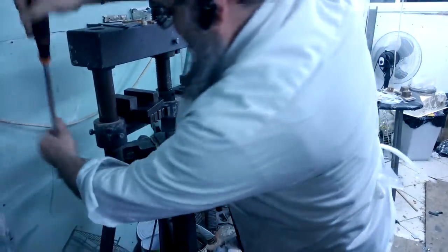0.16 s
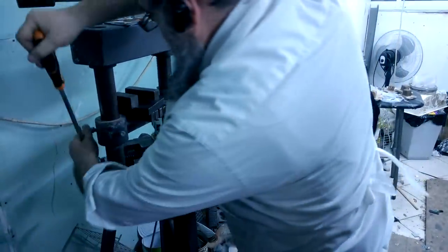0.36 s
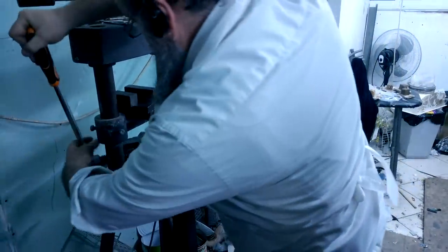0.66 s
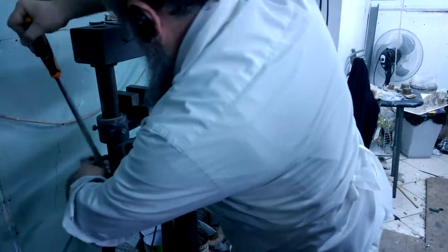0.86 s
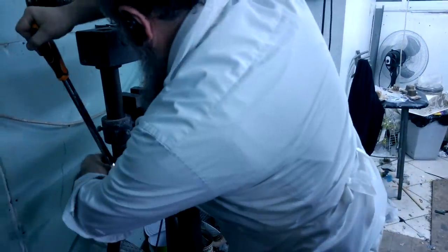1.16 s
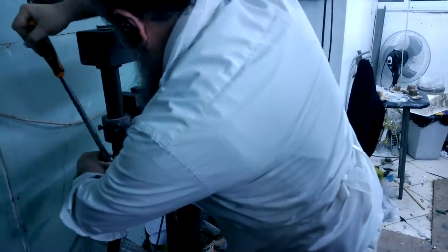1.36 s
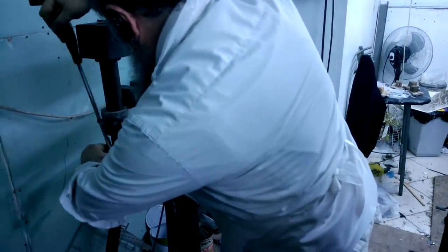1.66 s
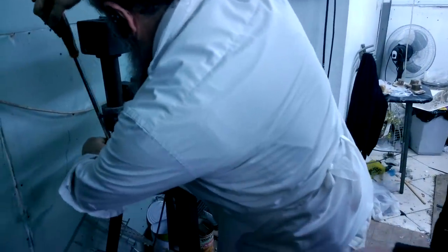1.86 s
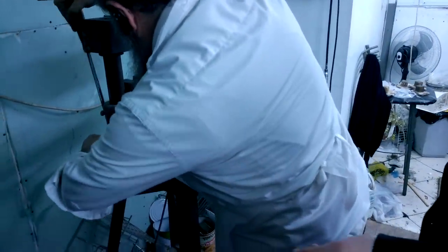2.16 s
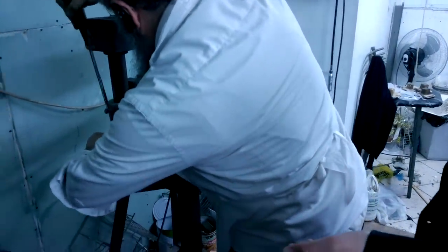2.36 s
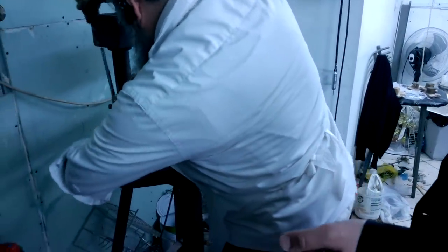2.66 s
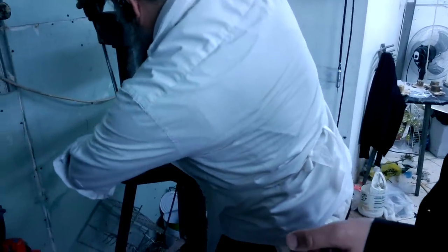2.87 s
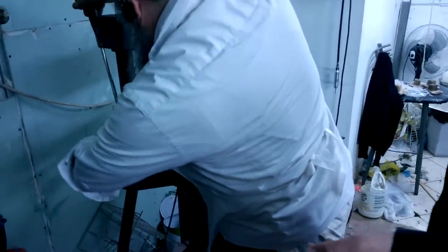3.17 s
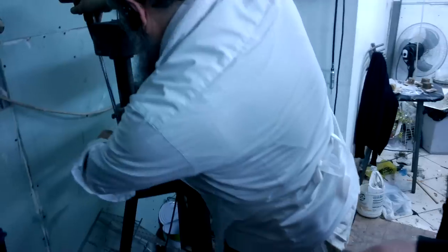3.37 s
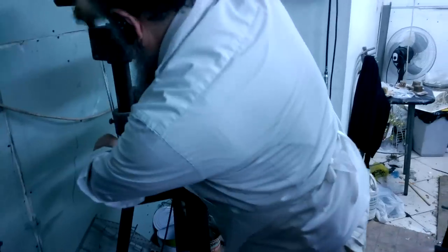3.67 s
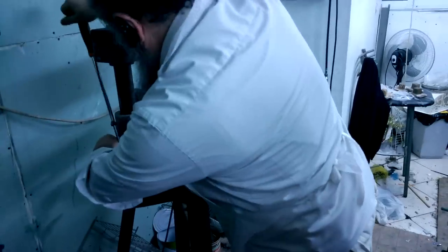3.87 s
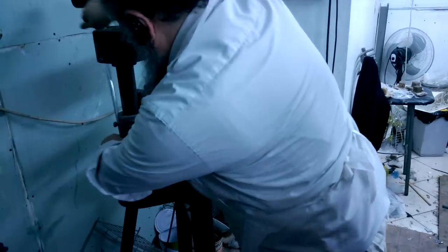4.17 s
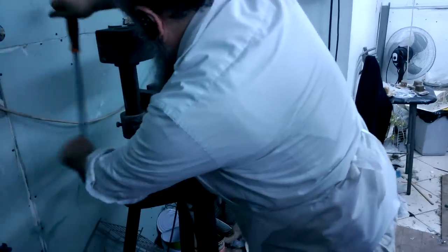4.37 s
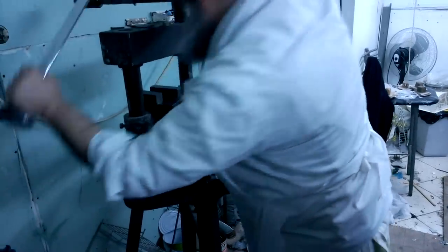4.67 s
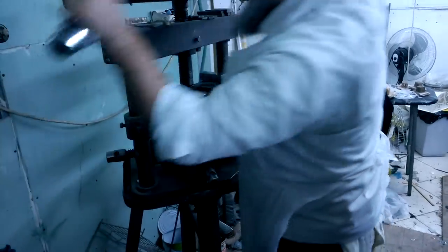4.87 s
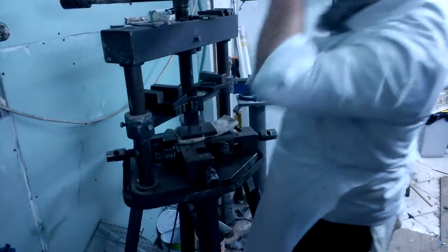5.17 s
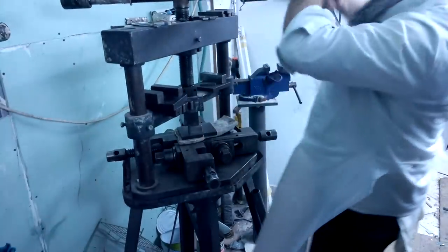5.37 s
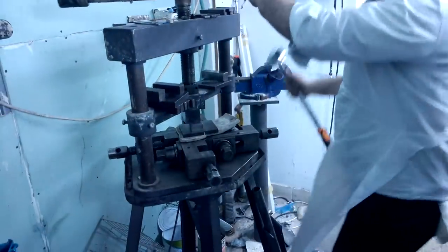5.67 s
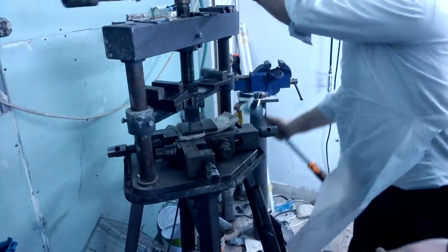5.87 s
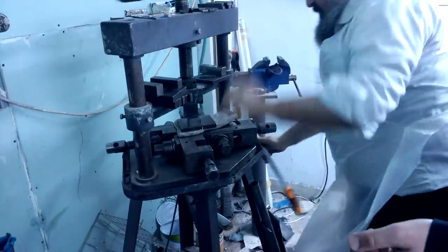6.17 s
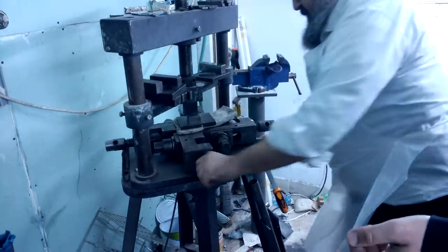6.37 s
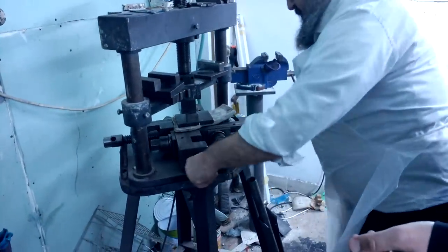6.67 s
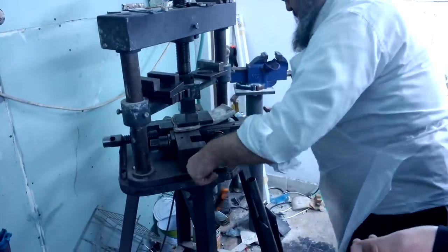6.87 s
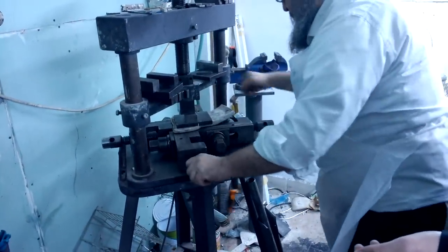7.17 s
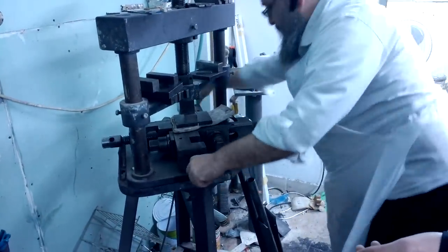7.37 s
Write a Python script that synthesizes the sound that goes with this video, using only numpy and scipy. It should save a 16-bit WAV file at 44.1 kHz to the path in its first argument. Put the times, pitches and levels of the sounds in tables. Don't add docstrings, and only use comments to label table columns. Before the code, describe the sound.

Close to a small bright microphone, steel strikes steel: a tick, two heavy ringing knocks, another shove, then blocks shifting with dull floor thuds. Crisp double ticks and a solid block clank follow. After a lull of fan hum and cloth rustle, a bar clatters down onto a metal table, its end drops, and faint taps finish. Short hard room; the background dips after loud hits.

```python
import sys
import numpy as np
from scipy import signal
from scipy.fft import rfft, irfft, next_fast_len
from scipy.io import wavfile
from scipy.ndimage import uniform_filter1d

SR = 44100
rng = np.random.default_rng(int(sys.argv[2]) if len(sys.argv) > 2 else 0)


def magnitude_from_level(level_db):
    exponent = np.asarray(level_db, float) / 20
    return 10 ** exponent


def materialize(psi):
    bounded = np.clip(np.atleast_2d(psi).T, -1, 1)
    quanta = np.round(bounded * 32767).astype(np.int16)
    wavfile.write(sys.argv[1], SR, quanta)


N = 331632


def rms_one(x):
    return x / np.sqrt(np.mean(x ** 2) + 1e-20)


def at_hz(points, hz):
    table_hz, value = np.array(points).T
    return np.interp(np.log(hz), np.log(table_hz), value)


def add(out, s, sound):
    i = round(s * SR)
    out[i:i + len(sound)] += sound[:N - i]


def drift(rate_hz):
    r = np.exp(-80 * np.pi * rate_hz / SR)
    slow = signal.lfilter([1], [1, -2 * r, r * r], rng.standard_normal(N // 40 + 2002))[2000:]
    return np.interp(np.arange(N) / 40, np.arange(len(slow)), rms_one(slow))


def coloured(spectrum, patchy_db):
    hz = np.maximum(np.fft.rfftfreq(N, 1 / SR), 1)
    noise = irfft(rfft(rng.standard_normal(N)) * magnitude_from_level(at_hz(spectrum, hz)), N)
    return rms_one(noise * magnitude_from_level(patchy_db * drift(5.7)))


def swells(rows, rest_db):
    t = np.arange(N) / SR
    return magnitude_from_level(rest_db) + sum(magnitude_from_level(db) * np.exp(-((t - s) / half) ** 2) for s, db, half in rows)


def partial(hz, t60, rise, t, spread_hz=0):
    knots = rng.standard_normal((2, 600))
    knots[:, 0] = 0
    in_phase, in_quadrature = [np.interp(t * max(spread_hz, 0) * 2.5, np.arange(600), k) for k in knots]
    rough = np.clip(spread_hz / 50, 0, .93)
    turn = 2 * np.pi * hz * t
    wave = (np.sqrt(1 - rough ** 2) + rough * in_phase) * np.sin(turn) + rough * in_quadrature * np.cos(turn)
    build_up = 1 - np.exp(-t / max(rise, 1e-4))
    return wave * build_up * np.exp(-np.log(1000) * t / t60)


# f/Hz, density/dB
HISS_COLOUR = [(410, -15), (700, 3.5), (1210, -4), (2120, 4.5), (3520, -5.5), (5130, -0.5), (7290, -2),
               (9330, -28), (12300, -5), (15100, -4), (15700, -4)]


def hiss():
    return magnitude_from_level(-54.5 - 3.0) * coloured(HISS_COLOUR, patchy_db=-0.5)


# f/Hz, level/dB
WHINE_LINES = [(11550, -82), (15320, -73)]


def whine():
    t = np.arange(N) / SR
    out = np.zeros(N)
    for hz, level_db in WHINE_LINES:
        level = magnitude_from_level(level_db + 1.5 * drift(40))
        out += level * np.sin(2 * np.pi * hz * t + 1.5 * drift(30))
    return out


# f/Hz, density/dB
RUMBLE_COLOUR = [(15, -30), (25, 7.5), (48, 3), (65, -11), (143, -2.5), (173, -8.5), (206, -6),
                 (228, -12.5), (408, -11), (585, -18), (682, -17), (867, -22.5), (1500, -26.5), (1950, -43),
                 (3300, -120)]
# t/s, level/dB, half length/s
FLOOR_HEAVES = [
    (.64, -42.5, 0.23),
    (1.61, -42, 0.099),
    (2.26, -49, 0.19),
    (3.73, -34.5, 0.092),
    (5.85, -72, 0.04),
    (1.05, -46, 0.14),
    (4.17, -50, 0.23),
]


def fan_and_floor():
    t = np.arange(N) / SR
    fan_db = -43 - 0.79 * t
    lull = 1 - 0.53 * np.exp(-((t - 6.17) / 0.15) ** 2)
    return lull * swells(FLOOR_HEAVES, fan_db) * coloured(RUMBLE_COLOUR, patchy_db=2.0)


# f/Hz, density/dB
CLOTH_COLOUR = [(530, -22), (900, -5), (1230, -18), (1530, -9.5), (1680, -9.5), (2420, -8), (2730, -8),
                (3040, -9), (4740, -4.5), (6640, -8), (9530, 4.5), (11400, -6.5), (16000, -26)]
# t/s, level/dB, half length/s
SLEEVE_SWISHES = [
    (0.0, -48, 0.16),
    (.57, -31.5, 0.049),
    (.88, -44.5, 0.18),
    (1.25, -49, 0.14),
    (5.79, -52, 0.06),
    (4.17, -52, .15),
    (5.1, -50, 0.24),
    (5.7, -52, 0.37),
    (6.2, -41.5, 0.077),
    (7.52, -55.5, 0.34),
]


def sleeves():
    return swells(SLEEVE_SWISHES, rest_db=-56.5) * coloured(CLOTH_COLOUR, patchy_db=1.0)


# t/s, level/dB, f/Hz, t60/s
STAND_THUDS = [(0.528, -31, 157, 0.14), (1.489, -30, 154.5, 0.26), (1.689, -33, 140, 0.095),
               (2.035, -33, 400, 0.32), (2.128, -28, 152, 0.18), (2.2, -35, 157.4, 0.16),
               (2.599, -37, 134, 0.2), (2.745, -39, 290, 0.14), (2.47, -42, 302, 0.12),
               (3.29, -47, 321, 0.14), (7.33, -49, 330, .2), (3.662, -27.5, 53, 0.13),
               (3.696, -24, 55, 0.081), (3.849, -31, 49, 0.11), (4.048, -42, 83.4, 0.12),
               (4.2, -40, 60, 0.19), (3.69, -34.5, 147.6, 0.27), (4.197, -34, 218, 0.19),
               (4.71, -36.5, 158, 0.18), (6.698, -44, 338, 0.2)]


def thuds():
    out, t = np.zeros(N), np.arange(SR // 2) / SR
    for s, level_db, hz, t60 in STAND_THUDS:
        add(out, s, magnitude_from_level(level_db + 5) * partial(hz, max(t60, .03), 0.0059, t))
    return out


def noise_bands(lump_hz, lump_db):
    centres = 130 * 2 ** (np.arange(29) / 4)
    size = next_fast_len(N + SR)
    hz = np.fft.rfftfreq(size, 1 / SR) + 1
    lumps = np.interp(hz / lump_hz, np.arange(900), rng.standard_normal(900))
    white = rfft(rng.standard_normal(size)) * magnitude_from_level(lump_db / (1 + (hz / 9000) ** 2) * lumps)
    bands = []
    for centre in centres:
        overlap = np.maximum(1 - 4 * np.abs(np.log2(hz / centre)), 0)
        bands.append(rms_one(irfft(white * overlap, size)))
    return np.array(bands, np.float32), centres


# f/Hz, share of a knock's decay
BAND_RING_SHARE = [(150, 1.1), (700, 0.93), (2500, 0.91), (6000, 0.79), (9500, 0.5), (14000, 0.43)]


def knocks(rows, modes, noise, upper_db, top_db, bass_db, modes_db, crack_db, crack_s, rise):
    out, t = np.zeros(N), np.arange(SR * 2 // 5, dtype=np.float32) / SR
    short = t[:SR // 4]
    bands, centres = noise
    swell = 1 - np.exp(-t / (rise + 3.3 / centres[:, None]))
    crack = magnitude_from_level(crack_db - 60 * t / crack_s) * (1 - np.exp(-t / 0.00021))
    crack_colour = magnitude_from_level(at_hz([(10000, -0.5), (13500, -14.0)], centres))
    crack = np.outer(crack_colour, crack).astype(np.float32)
    luck = rng.standard_normal((len(rows), len(bands) + len(modes)))
    for (s, force_db, heft_db, flat_db, decay), chance in zip(rows, luck):
        colour = [(140, heft_db + bass_db), (800, heft_db - 16.0), (2400, flat_db - 18),
                  (5400, flat_db / 2 + upper_db), (9600, -25.0), (11000, -33.0),
                  (12300, top_db), (14500, top_db), (16600, top_db - 7)]
        gains = magnitude_from_level(force_db + at_hz(colour, centres) + 1.5 * chance[:len(bands)])
        t60 = max(decay, .03) * at_hz(BAND_RING_SHARE, centres)
        dying = np.exp(np.outer(-np.log(1000) / t60, t).astype(np.float32))
        clatter = bands[:, round(s * SR):][:, :len(t)]
        sound = gains @ ((swell * dying + crack) * clatter)
        for (hz, level_db, ring_s), own in zip(modes, chance[len(bands):]):
            struck_db = force_db + at_hz(colour, hz) + modes_db + 0.34 * level_db + 1.8 * own
            ring = partial(hz, min(ring_s, 1.2 * decay, .4), rise, short, spread_hz=40 + hz / 120)
            sound[:len(short)] += magnitude_from_level(struck_db) * ring
        add(out, s, sound)
    return out


BLOCK_SLIDES = [
    (0.9494, -22, -10.5, -7.5, 0.86),
    (1.646, -19, -7, -7.5, 0.49),
    (2.7294, -50.5, 22.5, 12, 0.24),
    (3.1084, -31, -6.5, -4, 0.16),
    (3.2306, -44, -27, 6, 0.35),
    (3.4505, -25, -31, -12, 0.12),
    (3.6194, -22, -7.5, -21, 0.48),
    (3.6794, -29.5, -3.5, -5.5, 0.59),
    (7.31, -45, 7.5, -14, 0.31),
    (7.3565, -35.5, -7, -5, 0.2),
]
BLOCK_SHIFTS = [(2.0226, -9.5, -7, -10.5, 0.29), (2.0348, -6, -19, -27, 0.55),
                (2.0994, -17, -16, -12.5, 0.45), (2.4638, -25, -7.5, -6.5, 0.51), (2.7072, -40, -3, -12, 1),
                (2.8055, -35, -30, -30, 0.13), (3.4625, -29.5, 1, -9.5, 0.55), (4.008, -29, -23, -17, .3),
                (4.0153, -21, -23, -20, 0.42), (4.1804, -7, -11, -11.5, 0.45),
                (4.2877, -23, -27, -13, 0.21), (4.3685, -40, -38, -10, 0.31), (4.6944, -45, 8, -1, 0.7),
                (4.7057, -35.5, -19, 1, 0.28), (5.3094, -50.5, -6, 12.5, 0.39),
                (5.3584, -42.5, -8, 0, 0.31)]
# f/Hz, level/dB, t60/s
BLOCK_MODES = [(760, -3, 0.3), (2600, -12, 0.24), (2590, -22, 5.0), (4220, -5, 0.24), (4870, -14, 0.092),
               (5090, 27, 0.016), (6720, -2, 0.57), (6770, -26, 0.31), (8540, 9, 0.27), (8900, -8, 5.0),
               (9430, -5, 0.35), (9435, -15, 0.1)]


def blocks(noise):
    slid = knocks(BLOCK_SLIDES, BLOCK_MODES, noise, upper_db=-21.5, top_db=-43, bass_db=-26.5,
                  modes_db=1, crack_db=-3, crack_s=0.02, rise=0.011)
    shifted = knocks(BLOCK_SHIFTS, BLOCK_MODES, noise, upper_db=-21.5, top_db=-45, bass_db=-27.5,
                     modes_db=0.5, crack_db=6.5, crack_s=0.0068, rise=0.00049)
    return slid + shifted


TIP_TICKS = [
    (0.3254, -8.5, -38.5, -24.5, 0.3),
    (0.3664, -25, -27.5, -22, 0.86),
    (3.2633, -22.5, -27, -33.5, 0.49),
    (3.4113, -30, -34, -42, 0.27),
    (3.518, -6.5, -66, -29, 0.56),
    (3.5594, -6.5, -59, -28, 0.43),
    (3.9100, -5.5, -39.5, -29.5, 0.56),
    (5.5935, -38, -23, -3, 0.18),
    (6.6024, -39, -20, -12, 0.91),
    (6.665, -34, -29, -17, 0.52),
]
# f/Hz, level/dB, t60/s
EDGE_MODES = [(3290, 5.5, 0.23), (5300, -1, 0.47), (6100, -22, 0.083), (6100, 11, 0.29), (6600, 18.5, 0.2),
              (6720, -4, 0.17), (8140, 6, 0.186), (9900, -18, 0.32)]


def tip_ticks(noise):
    return knocks(TIP_TICKS, EDGE_MODES, noise, upper_db=-18.0, top_db=-45.5, bass_db=-13.0,
                  modes_db=-16.0, crack_db=13.5, crack_s=0.0084, rise=0.0016)


LAY_DOWN = [
    (6.0014, -6.5, -37, -15.5, 0.36),
    (6.004, 2, -56, -24, 0.44),
    (6.0325, -0.5, -75, -34, 0.64),
]
FAR_END = [
    (6.2243, -21, -50, -12, 0.43),
    (6.2425, 0.5, -47.5, -29, 0.62),
    (6.7085, -49, 8, 5, 0.21),
    (6.7419, -32.5, -44, -11, 1),
]
# f/Hz, level/dB, t60/s
TABLE_MODES = [(1660, -19, .4), (2090, -12, .3), (2950, -23, 0.17), (3320, -3, .4), (3990, -5, 0.27),
               (4560, -15, .3), (5000, -22, 0.21), (5550, -9, 0.33), (6400, -17, 0.3), (7100, -2, 0.26),
               (8380, -27, 0.14), (8200, -28, 0.19), (9500, -14, 0.29)]


def table_knocks(noise):
    laid = knocks(LAY_DOWN, TABLE_MODES, noise, upper_db=-21.5, top_db=-27.5, bass_db=-13.5,
                  modes_db=-3.0, crack_db=-10, crack_s=0.015, rise=0.0031)
    settled = knocks(FAR_END, TABLE_MODES, noise, upper_db=-26.5, top_db=-34, bass_db=-12.5,
                     modes_db=4.0, crack_db=-1, crack_s=0.015, rise=0.0011)
    return laid + settled


LEVER_KNOCKS = [
    (0.4888, -1.5, -20.5, -5, 0.49),
    (0.739, -18, -28, -15.5, 0.46),
    (0.8736, 1, -30.5, -15, 0.4),
    (1.4155, -18, -13, -9.5, 0.42),
    (1.4463, -27, -11.5, -8, 0.32),
    (1.479, -2.5, -17.5, -18.5, 0.47),
    (1.695, -18, -20, -13, 0.27),
]
# f/Hz, level/dB, t60/s
CLAMP_MODES = [(926, 17, 0.3), (1400, 2, 0.47), (2080, 3.5, 0.42), (2400, -13, 0.27), (2400, -7.5, 0.073),
               (2894, -3, 0.28), (3360, -16, 0.14), (3380, -26, 0.12), (4020, -7, 0.54), (4680, -29, 0.3),
               (5120, -27.5, 0.22), (6560, 8, 0.11)]


def lever_knocks(noise):
    return knocks(LEVER_KNOCKS, CLAMP_MODES, noise, upper_db=-24, top_db=-43.0, bass_db=-24.0,
                  modes_db=3.5, crack_db=9, crack_s=0.0099, rise=0.00033)


STRIKE_RISE_S, RUB_RISE_S = 0.00034, 0.015


def add_ring(out, s, hz, level_db, t60, rise, spread_hz):
    t = np.arange(int(min(.8 * t60, 1) * SR)) / SR
    add(out, s, magnitude_from_level(level_db) * partial(hz, t60, rise, t, spread_hz) * np.cos(np.pi / 2 * t))


# t/s, f/Hz, level/dB, t60/s, spread/Hz
STRUCK_MODES = [(.326, 3600, -26, .06, 69), (.326, 5260, -44, 0.41, 40), (.74, 2120, -38, .23, 67),
                (.74, 2410, -36, 0.18, 65), (.95, 8500, -26, .25, 48), (.949, 1400, -27.5, 0.36, 205),
                (1.479, 1500, -23, 0.35, 520), (1.479, 5120, -23, 0.24, 200), (1.416, 7100, -33, .2, 72),
                (1.479, 742, -31, 0.38, 78), (1.479, 7000, -28, .14, 73), (1.479, 8300, -25, 0.31, 55),
                (1.479, 2214, -32, 0.31, 79), (2.035, 9140, -18, 0.29, 120), (2.035, 5000, -14, .02, 71),
                (2.022, 1770, -19.5, 0.026, 110), (2.1, 6850, -27, 0.08, 60),
                (3.465, 3420, -37.5, 0.6, 180), (3.467, 6960, -31, .13, 65), (3.518, 9500, -13, 0.025, 20),
                (3.5585, 8400, -7.5, 0.03, 20), (3.5585, 6770, -9, 0.023, 18), (3.62, 2250, -36, 0.47, 210),
                (4.016, 4940, -36, 0.35, 120), (4.015, 4120, -27, .15, 40), (4.017, 4520, -30, 0.33, 300),
                (4.181, 4530, -34, 0.22, 97), (4.181, 1400, -21, 0.18, 80), (4.181, 2100, -23.5, 0.2, 200),
                (6.034, 9500, -8, 0.21, 166), (6.034, 10200, -15, .22, 120), (6.004, 9609, -12, 0.091, 150),
                (6.602, 4150, -51, .2, 120)]
RUBBED_MODES = [(.2, 7180, -50.5, 0.77, 36), (1.201, 8380, -39, 0.27, 50), (1.225, 1490, -43, 0.29, 221.6),
                (4.93, 1340, -47.5, 0.5, 228), (5.0, 742, -49.5, 1.2, 306), (5.03, 4740, -53, 1.6, 250),
                (5.04, 1580, -54, .5, 79.4), (4.92, 4600, -56, 1, 402), (5.15, 4700, -54, 1, 200)]
MORE_STRUCK_MODES = [(.3255, 6560, -10, 0.019, 30), (.3255, 2660, -34, 0.044, 36), (.362, 2330, -37, .06, 60),
                     (2.466, 2680, -39, 0.22, 230), (2.466, 6300, -35.5, 0.21, 470), (2.71, 1170, -43, .08, 50),
                     (3.62, 1160, -41, 0.11, 75), (4.708, 6570, -46, .25, 90), (4.706, 3870, -35, .04, 20),
                     (4.706, 5500, -39, .04, 20), (4.71, 2145, -42.5, 0.31, 204), (5.36, 3980, -45, 0.23, 200),
                     (5.593, 3930, -45, 0.28, 150), (5.75, 1304, -52, .3, 99), (6.004, 3290, -25, .3, 40),
                     (6.004, 5290, -23, .2, 38), (6.004, 9050, -18, .12, 200), (6.665, 3300, -46, .06, 200),
                     (6.665, 1690, -48, .15, 190), (7.355, 2000, -50, .15, 100), (.49, 1788, -23, .4, 330),
                     (.49, 4360, -25, .3, 450), (.949, 1915, -37, .3, 230), (.739, 3280, -30, 0.1, 530),
                     (3.91, 7100, -23, .14, 120), (3.519, 7100, -26.5, .2, 180), (1.7, 1440, -32.5, 0.28, 230),
                     (4.185, 764, -29.5, 0.29, 166), (6.25, 3435, -37, 0.5, 70), (6.245, 2450, -33, .3, 350),
                     (6.004, 4010, -25, .25, 90), (.49, 1930, -24, .3, 40), (.49, 4500, -28, .25, 50),
                     (.875, 2260, -27.5, .4, 45), (.9495, 1386, -24, 0.069, 25), (1.083, 3200, -35, 0.041, 20),
                     (4.181, 2480, -29, .2, 50), (4.181, 2760, -31, .2, 50), (4.166, 2370, -46, .05, 120)]


def single_modes():
    out = np.zeros(N)
    for rows, rise in ((STRUCK_MODES, STRIKE_RISE_S), (RUBBED_MODES, RUB_RISE_S), (MORE_STRUCK_MODES, STRIKE_RISE_S)):
        for s, hz, level_db, t60, spread_hz in rows:
            add_ring(out, s, hz, level_db, t60, rise, spread_hz)
    return out


JAW_MODES = [(4040, -8, 0.34, 120), (2860, -10.5, 0.35, 58), (5300, -12, 0.48, 80)]
JAW_HITS = [(.739, -28.5), (2.464, -37), (4.016, -34), (4.288, -34), (4.706, -42.5), (5.36, -40.5),
            (5.593, -40.5)]
NOTCH_MODES = [(6570, -3, 0.34, 210), (7100, -14, 0.11, 180)]
NOTCH_HITS = [(.326, -29.5), (3.519, -17), (3.559, -19.5), (3.911, -19.5), (4.287, -33.5)]
PIN_MODES = [(8980, -0.5, 0.28, 160), (2900, -8, 0.3, 150)]
PIN_HITS = [(1.695, -26.5), (2.463, -38.5), (2.708, -43.5)]
SHANK_MODES = [(2410, -3.5, 0.44, 42.5), (2860, -3.5, 0.41, 46), (3130, -1, 0.34, 160),
               (2730, -2, 0.28, 120), (3480, -6, 0.26, 220), (4845, -11.5, 0.34, 59), (5600, -11, 0.26, 90),
               (6730, -5, 0.24, 60), (9300, -2, 0.46, 140)]
SHANK_HITS = [(.875, -18.5)]
INGOT_MODES = [(800, 1, 0.28, 120), (1700, -8, 0.4, 300), (4920, 2, 0.27, 550), (13400, -10, 0.25, 150)]
INGOT_HITS = [(2.025, -22.5)]
HANDLE_MODES = [(2190, 4.5, 0.24, 200), (3080, -10, .25, 120), (4510, -7, 0.3, 150), (5680, -7, 0.25, 120),
                (8200, -1, 0.25, 105), (9200, 0, 0.39, 118)]
HANDLE_HITS = [(6.665, -45), (6.712, -54), (6.744, -47), (6.81, -51)]
PLATE_MODES = [(807, -7, 0.058, 820), (1650, -20, 0.42, 75), (2050, -13, 0.21, 45), (3260, -7.5, 0.31, 48),
               (3990, -10, 0.33, 60), (4650, -7, 0.31, 42), (5216, -4, 0.2, 48), (5700, -6, 0.23, 52),
               (7050, -11, .3, 62), (9050, 0, .2, 76)]
PLATE_HITS = [(6.007, -26.5), (6.036, -19.5), (6.245, -37)]
BAR_END_MODES = [(2062, -14, 0.42, 90), (4170, -9, .3, 44), (6710, -1.5, 0.28, 49), (8060, -8, 0.29, 46),
                 (8333, -17, .42, 56), (9200, -7, .25, 68), (9800, 0, .38, 41), (9900, -6, .25, 60)]
BAR_END_HITS = [(6.243, -22)]
SCREW_MODES = [(1323, -8, 0.26, 50), (2245, 1, 0.41, 45), (2420, -2, 0.37, 40), (2605, 1.5, 0.29, 35),
               (2850, -3, 0.45, 55), (3120, -0.5, .26, 94), (3340, -13, .35, 57), (2970, -3, 0.3, 40),
               (4150, -2, .3, 110), (5120, -6, 0.19, 46)]
SCREW_HITS = [(.49, -20.5), (.739, -44)]


def loose_parts():
    out = np.zeros(N)
    parts = [(JAW_MODES, JAW_HITS), (NOTCH_MODES, NOTCH_HITS), (PIN_MODES, PIN_HITS),
             (SHANK_MODES, SHANK_HITS), (INGOT_MODES, INGOT_HITS), (HANDLE_MODES, HANDLE_HITS),
             (PLATE_MODES, PLATE_HITS), (BAR_END_MODES, BAR_END_HITS), (SCREW_MODES, SCREW_HITS)]
    for modes, hits in parts:
        for s, blow_db in hits:
            for hz, mode_db, t60, spread_hz in modes:
                add_ring(out, s, hz, blow_db + mode_db, t60, STRIKE_RISE_S, spread_hz)
    return out


BAR_LINES = (8091, 8245)
# t/s, level/dB, t60/s, rise/s, spread/Hz
LOW_RINGS = [(.49, -9.5, 0.77, 0.052, 1), (.878, -14.5, 0.41, 0.013, 9), (.96, -25, 0.34, .01, 51),
             (1.24, -44.5, 0.49, .02, 16), (4.294, -35, 0.3, 0.014, 22), (4.361, -32, 0.64, 0.01, 24),
             (6.245, -29.5, 0.58, .02, 9.2)]
HIGH_RINGS = [(.2, -52, 0.62, 0.0069, 30), (.5, -26, 0.63, .04, 8.7), (0.749, -37, .5, .02, 10),
              (0.875, -10.5, 0.37, 0.0048, 8), (.97, -20.5, 0.37, .01, 53), (1.24, -43, 0.45, 0.017, 10),
              (1.416, -46, .5, .005, 30), (4.297, -29, 1.1, 0.0097, 32), (5.594, -46, 1.1, 0.02, 30)]


def singing_bar():
    out = np.zeros(N)
    for hz, rows in zip(BAR_LINES, (LOW_RINGS, HIGH_RINGS)):
        for s, level_db, t60, rise, spread_hz in rows:
            add_ring(out, s, hz, level_db, t60, rise, spread_hz)
    return out


def microphone(x):
    centre_hz, width_hz, lift_db = 9450, 1400, 7
    r, w = np.exp(-np.pi * width_hz / SR), 2 * np.pi * centre_hz / SR
    peak = signal.lfilter((1 - r * r) / 2 * np.array([1, 0, -1]), [1, -2 * r * np.cos(w), r * r], x)
    return x + (magnitude_from_level(lift_db) - 1) * peak


def ducking(x, from_level_db, slope, release_db_s):
    level_db = 10 * np.log10(uniform_filter1d(x ** 2, size=441) + 1e-12)
    ramp = release_db_s * np.arange(N) / SR
    held_db = np.maximum.accumulate(level_db + ramp) - ramp
    excess_db = np.maximum(held_db - from_level_db, 0)
    return magnitude_from_level(-slope * uniform_filter1d(excess_db, size=221))


def scene():
    noise = noise_bands(lump_hz=55, lump_db=3.8)
    clatter = blocks(noise) + tip_ticks(noise) + table_knocks(noise) + lever_knocks(noise)
    ringing = single_modes() + loose_parts() + singing_bar()
    near = microphone(clatter) + ringing + thuds()
    background = hiss() + fan_and_floor() + sleeves()
    gain = ducking(near, from_level_db=-33.0, slope=0.24, release_db_s=36)
    return (near + whine() + background * gain)[None]


def roll_off(x):
    return signal.sosfilt(signal.butter(12, 16970, fs=SR, output="sos"), x)


def record(dry):
    rounded = .65 * np.tanh(dry / .65)
    steep_top = signal.ellip(12, .5, 48, 15745, fs=SR, output="sos")
    bass_loss = signal.butter(3, 35, "high", fs=SR, output="sos")
    mix = signal.sosfilt(bass_loss, signal.sosfilt(steep_top, rounded))
    return roll_off(mix)


dry = scene()
out = record(dry)
materialize(out)
```